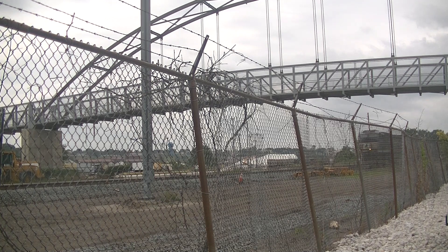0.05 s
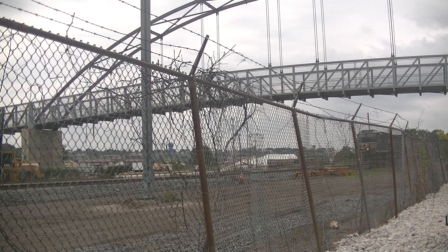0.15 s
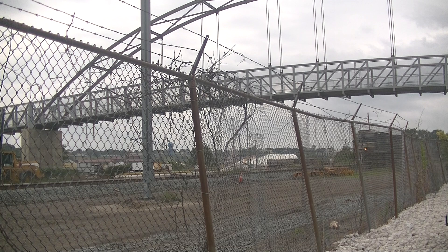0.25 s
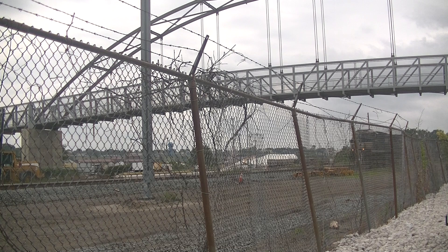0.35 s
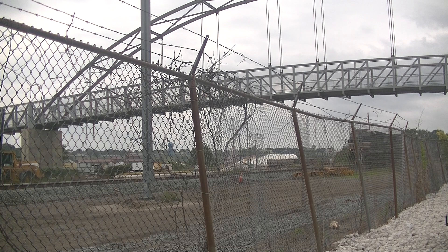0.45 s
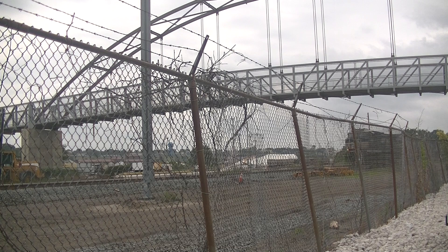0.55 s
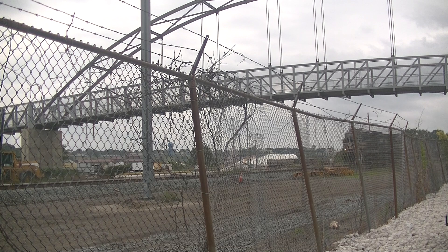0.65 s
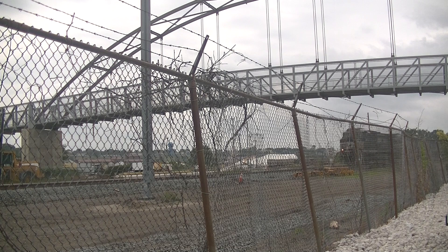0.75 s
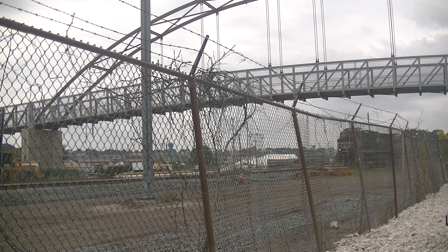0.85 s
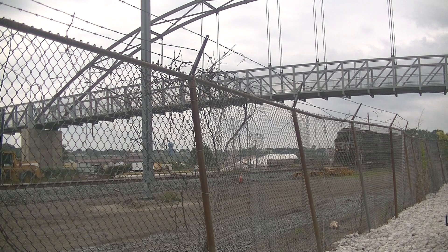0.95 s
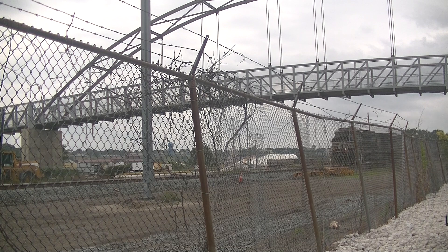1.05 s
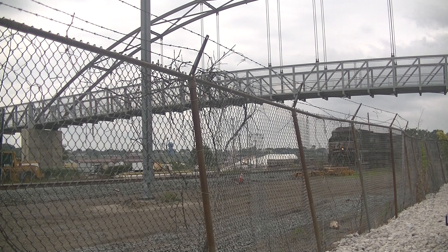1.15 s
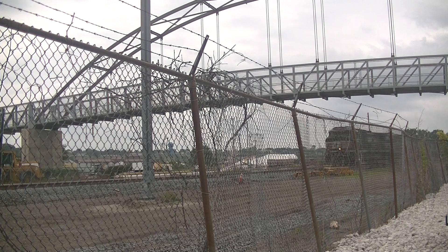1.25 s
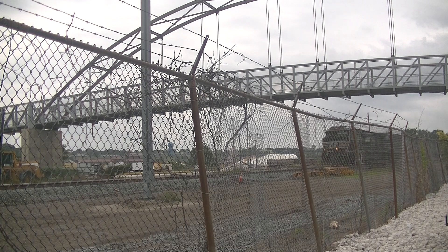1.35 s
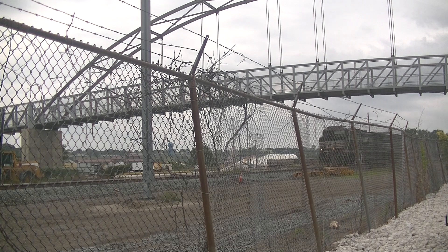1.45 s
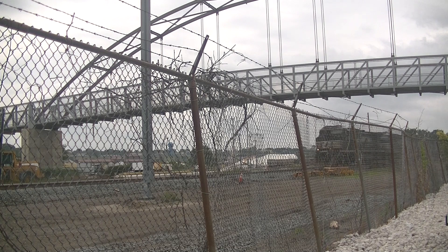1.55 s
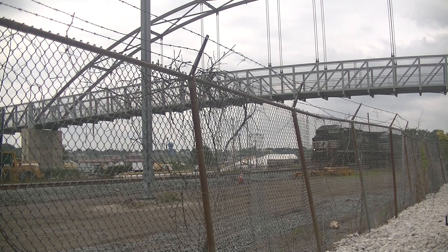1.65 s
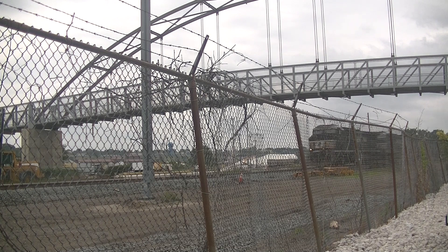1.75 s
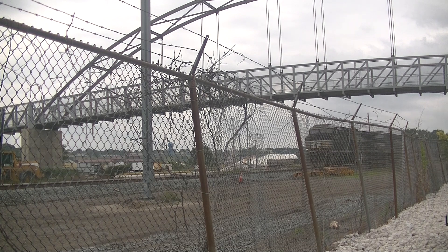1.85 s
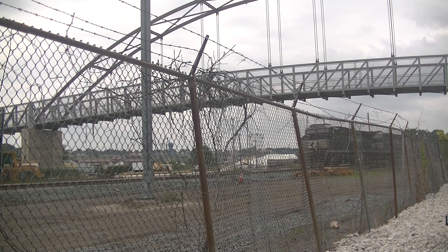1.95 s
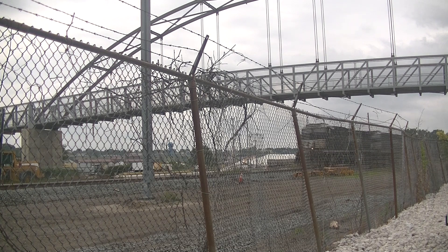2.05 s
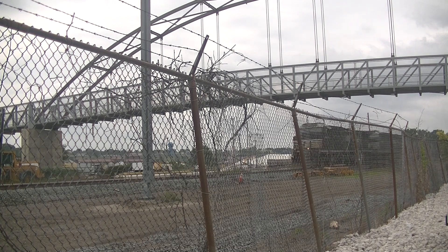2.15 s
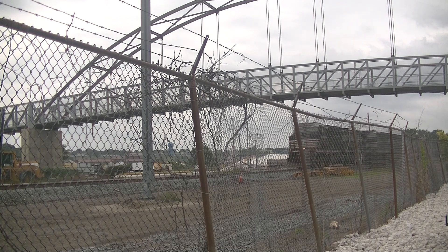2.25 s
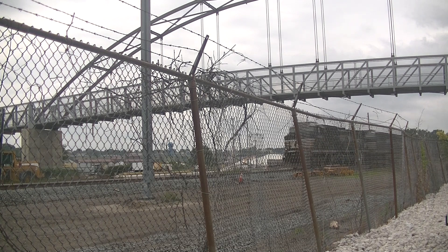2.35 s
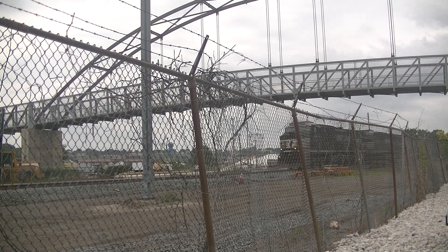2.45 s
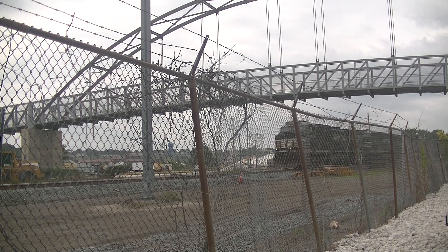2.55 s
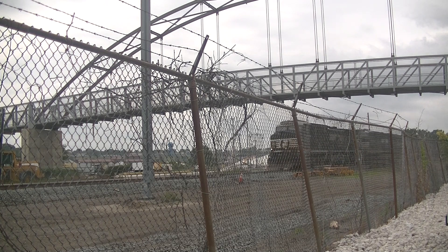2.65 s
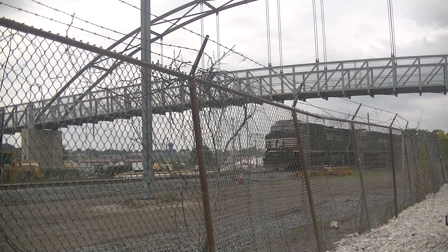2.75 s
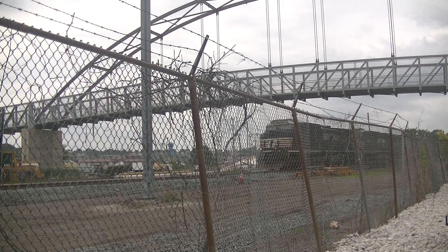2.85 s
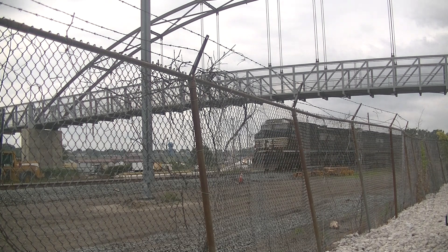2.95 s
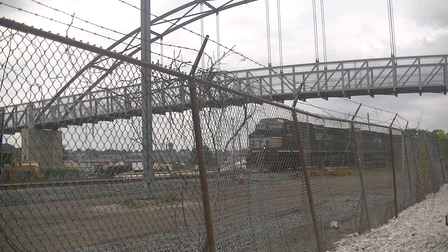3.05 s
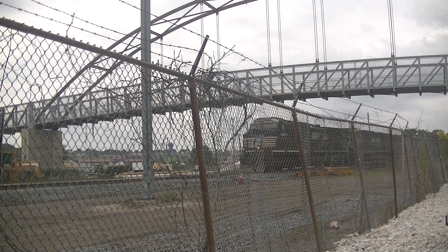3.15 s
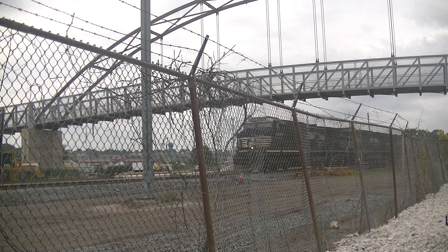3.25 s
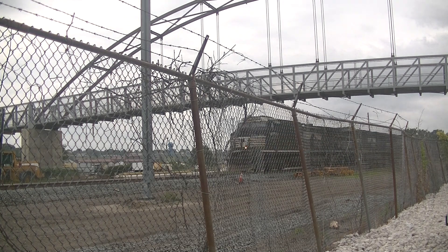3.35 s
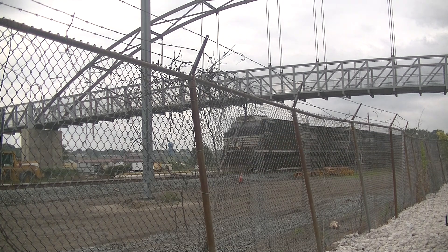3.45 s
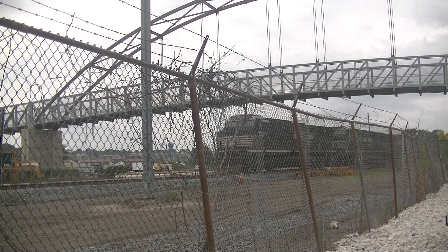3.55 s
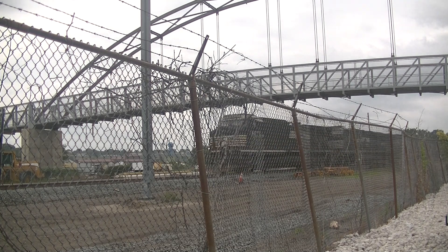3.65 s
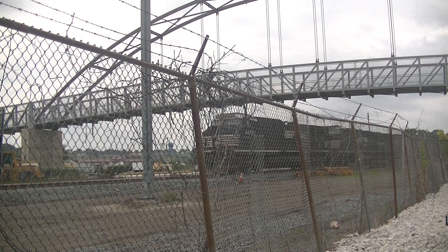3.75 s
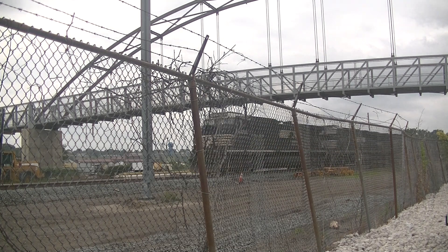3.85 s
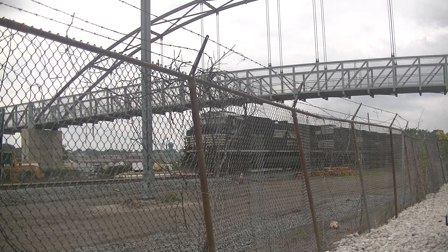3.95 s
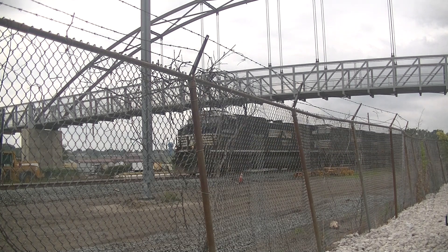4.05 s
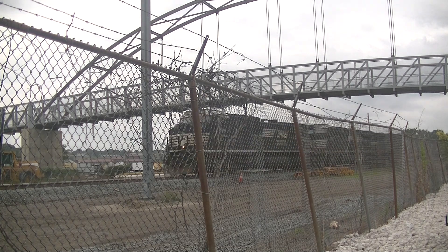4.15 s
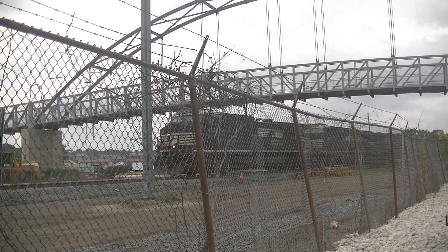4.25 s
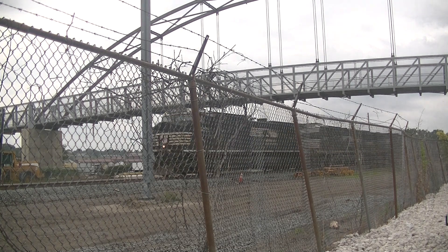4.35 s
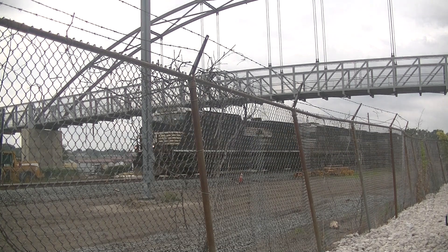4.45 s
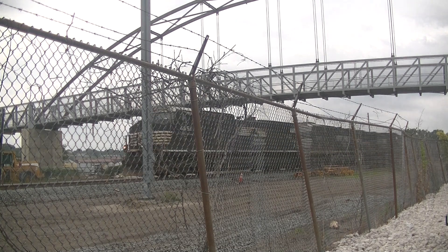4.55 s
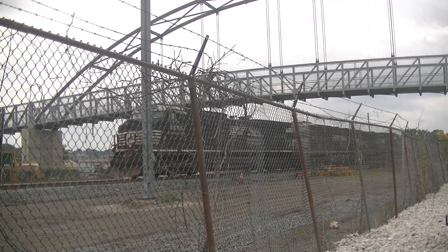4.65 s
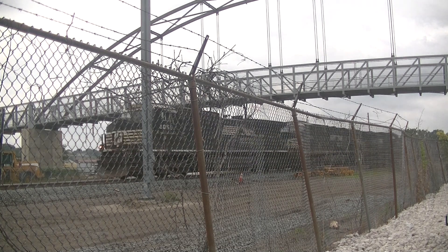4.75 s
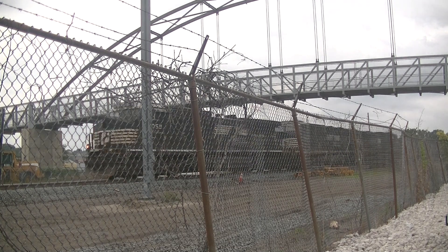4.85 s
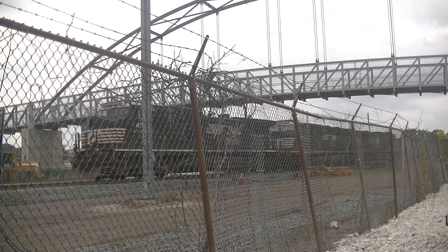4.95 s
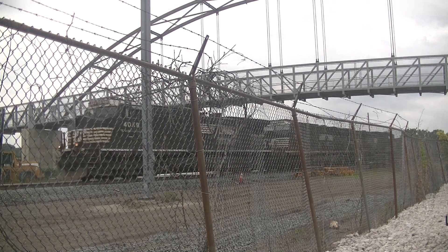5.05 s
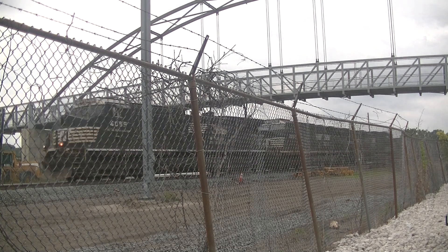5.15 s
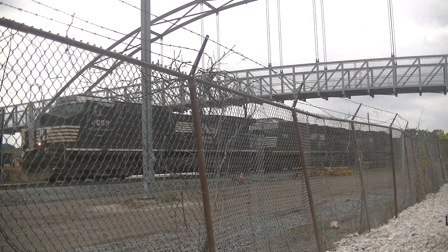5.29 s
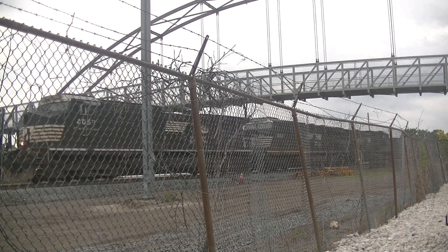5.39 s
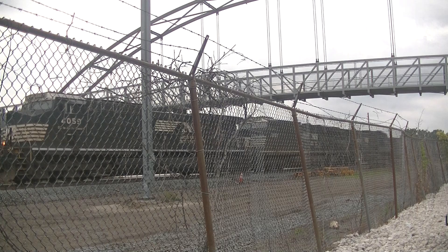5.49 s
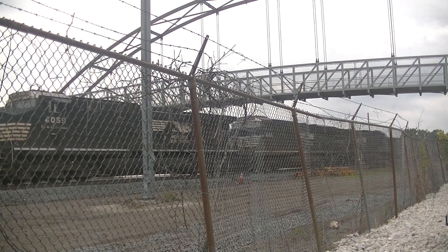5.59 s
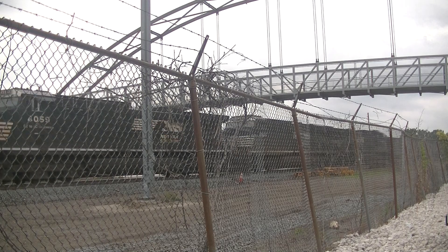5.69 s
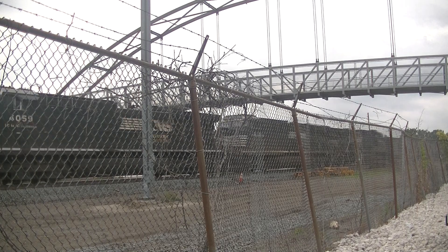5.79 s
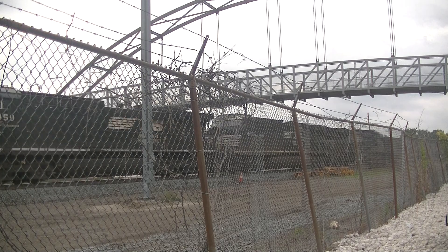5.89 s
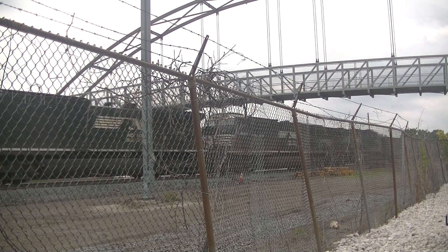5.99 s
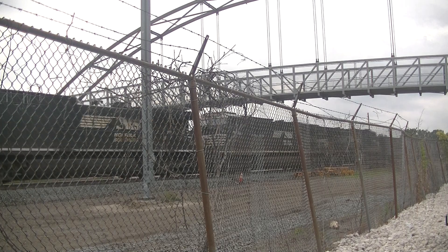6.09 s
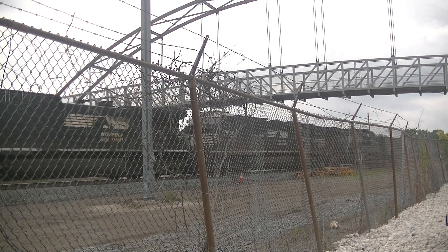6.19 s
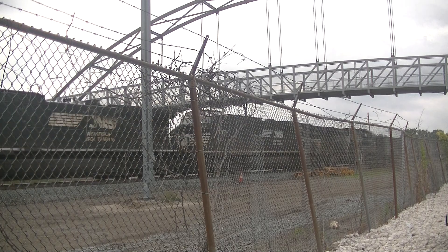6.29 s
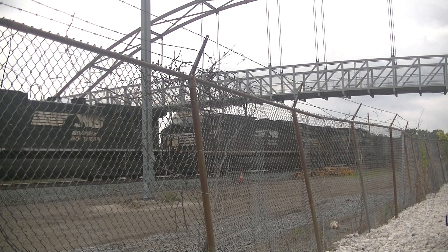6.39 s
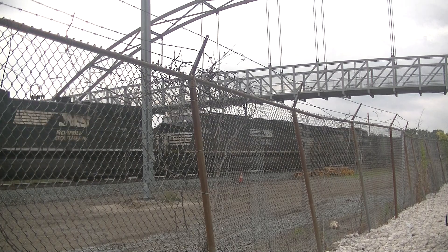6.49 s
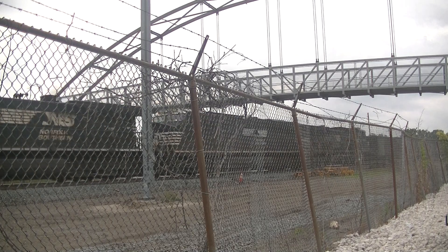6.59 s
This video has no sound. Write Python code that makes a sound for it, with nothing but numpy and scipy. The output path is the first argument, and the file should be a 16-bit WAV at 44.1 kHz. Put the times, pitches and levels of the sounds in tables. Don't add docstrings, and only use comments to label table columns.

```python
import sys
import numpy as np
from scipy import signal
from scipy.fft import rfft, irfft, next_fast_len
from scipy.io import wavfile
from scipy.ndimage import uniform_filter1d

SR = 44100
rng = np.random.default_rng(int(sys.argv[2]) if len(sys.argv) > 2 else 0)


def attenuation_scalar(level_db):
    decades = np.asarray(level_db, float) / 20
    return 10 ** decades


def store_wav(level_fs):
    pcm = np.round(np.clip(np.atleast_2d(level_fs), -1, 1) * 32767)
    wavfile.write(sys.argv[1], SR, pcm.T.astype(np.int16))


N = 292148
T = np.arange(N) / SR
SIZE = next_fast_len(N)
HZ = np.maximum(np.arange(SIZE // 2 + 1) * SR / SIZE, 1)
COARSE = np.arange(N // 16 + 2) * 16

# (time [s], roar level [dB])
NEARNESS_DB = [
    (0.0, -35),
    (2.12, -31.5),
    (4.64, -25),
    (4.66, -25),
    (5.51, -22.5),
    (5.73, -26.5),
    (6.62, -22.5),
]
FAR_DB = -34
ABREAST_S, ABREAST_WIDTH_S = 4.18, 0.069
DOPPLER, PASSES_S, PASS_WIDTH_S = 0.012, 5.2, 1.493

# (frequency [Hz], density [dB])
ROAR_SPECTRUM = [(40, -58), (70, -46), (200, -26.5), (320, -19.5), (430, -17), (540, -10), (680, -12),
                 (850, -8.5), (1000, -9.5), (1300, -4.5), (1800, -10.5), (2400, -9.5), (3300, -16.5),
                 (9000, -52.5)]
GROWL_DB, GROWL_FOLLOWS, GROWL_ABREAST_DB = -51.5, 0.46, 5.5
RUMBLE_DB, RUMBLE_FOLLOWS, RUMBLE_ABREAST_DB = -64.5, 0.93, -4
# (time [s], peak [dB], ring [Hz])
RAIL_JOINTS = [(4.04, -26, 452), (4.29, -31.5, 440), (4.348, -34, 400), (4.72, -28, 428), (4.74, -22, 530),
               (5.03, -29.5, 399), (5.19, -26, 446), (5.4, -37, 520), (5.52, -23.5, 433.3),
               (5.53, -20, 546), (5.68, -25, 520), (5.77, -34, 604)]

# (frequency [Hz], density [dB])
SCRUB_SPECTRUM = [(700, -53), (1500, -10), (2300, -2), (3000, -6.5), (3700, -7), (4200, -6), (5400, -10.5),
                  (7000, -12.5), (7900, -24), (11000, -26), (14000, -30.5), (15600, -34)]
# (start [s], attack [s], hold [s], level above 8 kHz [dB], fall [dB/s])
FLANGE_CONTACTS = [
    (.2, 0.16, 0.026, -56.5, 93),
    (1.144, 0.2, 0.073, -57, 33),
    (1.95, 0.23, 0.27, -61, 28),
    (2.74, 0.17, 0.046, -53.5, 32),
    (4.11, 0.02, 0.071, -39, 40),
    (4.153, 0.17, 0.52, -38.5, 39),
    (5.503, 0.21, 0.052, -33, 58),
    (6.495, 0.038, .1, -39.5, 37),
]
SCRUB_FLOOR_DB, SCRUB_FOLLOWS = -63, 1
BODY_DB, BODY_PER_DB = 16, -0.289
# (frequency [Hz], gain [dB])
RIM_MODES = [(7510, 1), (7880, 0), (8360, 0.5), (8850, 3.5), (9280, 4.5), (10240, 3.5), (10760, -2),
             (11100, 0), (11850, 1), (12260, 2), (12580, 3), (13510, 4), (14290, 5), (14850, 5)]
RIM_WIDTH_HZ = 150

# (start [s], end [s])
WHEEL_SPANS_S = [
    (4.13, 4.5),
    (4.539, 5.16),
    (4.981, 5.27),
    (5.55, 5.94),
    (5.781, 6.28),
    (6.49, 6.7),
]
# (frequency [Hz], level [dB])
WHEEL_1_MODES = [(2288, -41), (3079, -41), (3435, -45), (4592, -37), (4872, -43), (5319, -55), (5722, -60),
                 (6105, -47), (7510, -47), (8360, -51), (8882, -50), (10244, -65), (10767, -70),
                 (13512, -65)]
# (frequency [Hz], level [dB])
WHEEL_2_MODES = [(2530, -34.5), (4635, -52), (5712, -57), (6175, -46), (6966, -55), (7510, -57),
                 (8403, -49.5), (9281, -52), (10239, -56), (10756, -63), (11854, -61), (13507, -61)]
# (frequency [Hz], level [dB])
WHEEL_3_MODES = [(3260, -50), (3397, -41), (3860, -54), (4474, -45), (4522, -50), (5652, -51), (6094, -50),
                 (6955, -46), (8780, -60)]
# (frequency [Hz], level [dB])
WHEEL_4_MODES = [(2885, -37), (3058, -36), (4215, -49), (4840, -39), (5249, -45), (5717, -45), (7009, -51),
                 (7450, -52), (7892, -51), (8344, -50), (8812, -49), (10800, -62), (12586, -61),
                 (13410, -55)]
# (frequency [Hz], level [dB])
WHEEL_5_MODES = [(3208, -38), (3300, -48), (4517, -41), (4770, -51), (5238, -47), (5663, -49), (6040, -44),
                 (6546, -54), (7865, -51), (8323, -48), (9189, -53), (10056, -54), (10654, -57),
                 (10912, -54), (11014, -61), (11612, -59), (12166, -59), (12554, -60), (13017, -66),
                 (13544, -60), (14163, -63), (14874, -63)]
# (frequency [Hz], level [dB])
WHEEL_6_MODES = [(3989, -47), (4387, -52), (4743, -50), (4985, -36), (5852, -33), (6648, -40)]
WHEEL_WIDTH_HZ, WHEEL_WIDTH_SHARE, WHEEL_STEADY = 95, 0.012, 0.1
STAGGER_S = 0.07
# (start [s], length [s], frequency [Hz], level [dB])
SINGING = [(4.11, 0.2, 3860, -35), (4.24, 0.17, 3945, -29), (4.82, 0.24, 3860, -35), (4.58, .25, 3900, -40),
           (5.68, .34, 3853, -32), (4.3, 0.4, 6610, -33), (4.48, 0.4, 6605, -33.5), (5.77, .24, 7433, -30),
           (5.58, .08, 5500, -48), (3.38, 0.68, 1610, -34), (4.8, 0.24, 3135, -33), (4.55, 0.07, 2205, -34),
           (0.35, .09, 3950, -48), (1.3, 0.14, 4160, -49), (2.82, 0.16, 6810, -54),
                 (2.05, .5, 10340, -67), (2.77, .24, 11480, -67), (4.33, .56, 6690, -35),
                 (4.24, 0.18, 3983, -32), (5.54, 0.26, 2465, -30), (5.55, .06, 7005, -43),
                 (6.01, .19, 3105, -37), (5.3, .15, 3270, -43), (4.2, 0.32, 4580, -39),
                 (3.4, .6, 3500, -43), (4.28, .2, 4850, -39), (4.74, .1, 4620, -37), (4.62, .1, 5720, -42),
                 (4.76, .28, 3370, -39), (4.22, .12, 4250, -38), (1.32, .1, 4050, -50)]
SING_ATTACK_S, SING_RELEASE_S, SING_SWAY_DB, SING_WAVER = 0.08, 0.13, 1.5, 0.0015
SING_WIDTH_HZ, SING_WIDTH_SHARE, SING_STEADY = 90, 0.013, 0.15
SING_LOCK_HZ = 5000

FAR_MESH_HZ, FAR_SAG_HZ, FAR_PASS_S, FAR_GEARS_DB, FAR_SECOND_DB = 1195, 89.5, 5.5, -31, -6
FAR_GEARS_FOLLOW, FAR_GEARS_SWELL_DB, GEAR_SAG_S = 0.094, 4, 0.27
# (enter [s], leave [s], mesh [Hz], sag [Hz/s], level [dB])
NEAR_GEARS = [
    (4.702, 5.968, 1105, 36.1, -22),
    (5.78, 6.533, 1080, 22, -18),
]
NEAR_SECOND_DB, NEAR_SWELL_S, NEAR_WIDTH_HZ = (-7, -3), (0.61, 0.32), (79, 107)
NEAR_FADE_S, NEAR_STEADY = 0.11, 0.2
GEAR_PASS_S, GEAR_PASS_HZ = 6.56, 69.6

FAN_A_HZ, FAN_A_DB = 266.8, (-54.5, -50, -45)
FAN_B_HZ, FAN_B_DB = 287, (-54, -50.5, -50.5)
# (start [s], length [s], gain [dB])
FAN_A_BEAMS = [
    [(1.6, 0.3, 9.5), (2.5, 0.12, 5), (3.1, 0.93, 7.5), (4.25, 0.29, 7.5), (4.55, 0.071, -8),
     (4.66, 0.15, 6), (4.92, .1, 0), (5.08, 0.22, 8), (5.4, 0.41, 3), (5.8, 0.34, 8)],
    [(3.4, 0.57, 6.5), (4.7, 0.42, 6.5), (5.5, 0.18, 8)],
    [(1.45, 0.84, 5), (2.47, 0.26, 8), (2.8, 0.24, 6), (3.25, 0.79, 6.5), (4.75, 0.49, 2.5), (6.1, 0.58, 6)],
]
# (start [s], length [s], gain [dB])
FAN_B_BEAMS = [
    [(3.3, 0.48, -1), (4.56, 0.074, -7), (4.9, 0.092, 8), (5.05, 0.32, 8), (5.6, .65, 6.5)],
    [(6.1, 0.72, 2.4)],
    [(3.9, 0.38, 5.2), (6.45, .2, 6)],
]
BEAM_EDGE_S = 0.038
FAN_WAVER, FAN_SWAY_DB, FAN_FOLLOWS, FAN_WIDTH_HZ, FAN_STEADY = 0.004, 0.8, 0.95, 11, 0.5

TURBO_HZ, TURBO_SAG_HZ_PER_S2, TURBO_ENDS_S = 3560, 13.3, 3.8
TURBO_DB, TURBO_FOLLOWS, TURBO_SWAY_DB = -49, 1.1, 1.0
# (start [s], length [s], gain [dB])
TURBO_BEAMS = [
    (.9, .4, 4),
    (1.5, .9, 2),
    (2.55, .5, 4),
    (3.2, .5, 5),
]

TICK_FIRST_S, TICK_PERIOD_S, TICK_EXTRA_S, TICK_DB = 0.0172, 0.33393, 2.1645, -38
TICK_RATTLE_S, TICK_WHIRR_S, TICK_WHIRR_DB = 0.0039, 0.02, -10
# (time [s], peak [dB], push width [ms])
KNOCKS = [(0.259, -14, 0.73), (0.2712, -15, 0.97), (.293, -27, 1.1), (.437, -21, 1.26), (.553, -22, 1.3),
          (.5765, -17, 1.16), (.824, -25, 1.3), (0.9299, -8, 0.85), (1.2041, -20, 1.24),
          (1.3317, -21, 1.15), (1.974, -19, 1.2), (2.313, -21, 1.2), (2.356, -21, 1.2), (2.694, -27, 1.7),
          (2.974, -20, 1.3), (3.175, -20, 1.2)]
# (time [s], peak [dB])
TAPS = [
    (1.5878, -30),
    (5.2494, -26),
]

# (frequency [Hz], common share [1])
LIKENESS = [(60, 0.6), (130, 0.92), (290, 0.71), (640, 0.89), (1000, 0.93), (1410, 0.75), (2200, 0.49),
            (3100, 0.56), (6820, 0.74), (15000, 0.22)]
# (frequency [Hz], left over right [dB])
LEFT_OVER_RIGHT_DB = [(60, 13), (130, 4.5), (250, 10), (400, 11), (700, 15), (1290, 14.5), (1900, 18.5),
                      (2500, 13), (3300, 8), (4400, 9.5), (8100, 12), (15000, 17)]
# (frequency [Hz], left lead [rad])
LEFT_LEAD_RAD = [(100, 1), (1000, -0.17), (3000, -1.06), (4000, 0.6), (7500, -1.32), (15000, -1.1)]


def rolling():
    roar_db, scrub_db = nearness(), flange()
    abreast = step(ABREAST_S, ABREAST_WIDTH_S)
    growl_db = GROWL_DB + GROWL_FOLLOWS * nearer() + GROWL_ABREAST_DB * abreast
    rumble_db = RUMBLE_DB + RUMBLE_FOLLOWS * nearer() + RUMBLE_ABREAST_DB * abreast
    body_db = BODY_DB + BODY_PER_DB * (scrub_db - FAR_DB + 20.5)
    shelves = [(690, growl_db - roar_db + 17), (313, rumble_db - growl_db + 11.0)]
    roar = airy(ROAR_SPECTRUM, (1300, 2000), 1.0, shelves, 3)
    scrub = airy(SCRUB_SPECTRUM, (8000, 15000), 1.0, [(9000, 1.55 * (body_db - 11.5))], 9, RIM_MODES)
    scrub = scrub * attenuation_scalar(0.57 * walk(29) + 0.7 * walk(370))
    clunks, span = np.zeros(N), np.arange(-1024, 4096)
    t = span / SR
    for s, db, hz in RAIL_JOINTS:
        swell = np.exp(-((t - 0.02) / 0.024) ** 2)
        clunks[int(s * SR) + span] += attenuation_scalar(db - 5.5) * ring(hz + 0 * t, 110, steady=0.35) * swell
    return roar * attenuation_scalar(roar_db - 0.14) + scrub * attenuation_scalar(scrub_db - 1.7) + clunks


def flange():
    power = attenuation_scalar(2 * (SCRUB_FLOOR_DB + SCRUB_FOLLOWS * nearer()))
    for start, attack, hold, db, fall in FLANGE_CONTACTS:
        bite = np.clip((T - start) / attack, 0, 1)
        slide_s = np.maximum(T - start - attack - hold, 0)
        power = power + (bite * attenuation_scalar(db - fall * slide_s)) ** 2
    return 10 * np.log10(power)


def squeal():
    out, scrub_db = np.zeros(N), flange()
    wheels = (WHEEL_1_MODES, WHEEL_2_MODES, WHEEL_3_MODES, WHEEL_4_MODES, WHEEL_5_MODES, WHEEL_6_MODES)
    for (start, end), modes in zip(WHEEL_SPANS_S, wheels):
        on = slice(int(start * SR), int(end * SR))
        t = T[on]
        contact = np.clip(np.minimum(t - start, end - t) / 0.024, 0, 1)
        contact = contact * attenuation_scalar(0.94 * (scrub_db[on] - np.median(scrub_db[on])))
        for (hz, db), late in zip(modes, rng.uniform(-0.15, 1, len(modes))):
            fade = held(start + STAGGER_S * late, end - start - 2 * STAGGER_S, 0.082, 0.13, t)
            tone = ring(hz + 0 * t, WHEEL_WIDTH_HZ + WHEEL_WIDTH_SHARE * hz, WHEEL_STEADY)
            out[on] += contact * fade * attenuation_scalar(db + 4.0 + hz / 5000) * tone
    bite = np.exp(-((T - 4.17) / 0.079) ** 2)
    out += attenuation_scalar(-21.5) * bite * ring(2500 + 0 * T, 500, steady=0.042)
    sway_db, waver = SING_SWAY_DB * walk(6.6), 1 + SING_WAVER * walk(6.7)
    for s, length, hz, db in SINGING:
        on = slice(int(s * SR), int((s + length + SING_RELEASE_S) * SR))
        fade = held(s, length, SING_ATTACK_S, SING_RELEASE_S, T[on])
        width_hz = SING_WIDTH_HZ + SING_WIDTH_SHARE * hz
        tone = ring(hz * waver[on], width_hz, SING_STEADY * (hz / SING_LOCK_HZ) ** 2)
        out[on] += fade * attenuation_scalar(db + 3.5 + sway_db[on]) * tone
    return out


def gears():
    swell_db = FAR_GEARS_FOLLOW * nearer() + FAR_GEARS_SWELL_DB * step(FAR_PASS_S - 0.4, 0.38)
    fade = held(-0.91, FAR_PASS_S + 0.99, 0.72, 0.46)
    far_hz = FAR_MESH_HZ - FAR_SAG_HZ * step(FAR_PASS_S, GEAR_SAG_S)
    out = fade * attenuation_scalar(FAR_GEARS_DB - 1.0 + swell_db) * gear_whine(far_hz, 238, FAR_SECOND_DB)
    settings = zip(NEAR_GEARS, NEAR_SECOND_DB, NEAR_SWELL_S, NEAR_WIDTH_HZ)
    for (enter, leave, mesh_hz, sag, db), second_db, swell_s, width_hz in settings:
        hz = mesh_hz - sag * (T - enter) - GEAR_PASS_HZ * step(GEAR_PASS_S, 0.0576)
        fade = held(enter, leave - enter, swell_s, NEAR_FADE_S)
        out = out + fade * attenuation_scalar(db) * gear_whine(hz, width_hz, second_db, NEAR_STEADY)
    return out


def gear_whine(hz, width_hz, second_db, steady=0.045):
    octave = ring(2 * hz, 2.04 * width_hz, 0.044)
    return ring(hz, width_hz, steady) + attenuation_scalar(second_db - 3.0) * octave


def fan(blade_hz, levels_db, beams):
    shift = DOPPLER * (0.5 - step(PASSES_S, PASS_WIDTH_S))
    hz, out = blade_hz * (1 + shift + FAN_WAVER * walk(1.501)), 0
    for k, (db, gaps) in enumerate(zip(levels_db, beams), 1):
        open_db = sum(gain_db * held(s, length, BEAM_EDGE_S, BEAM_EDGE_S) for s, length, gain_db in gaps)
        level_db = db + FAN_FOLLOWS * nearer() + open_db + FAN_SWAY_DB * walk(3.8)
        out = out + ring(k * hz, FAN_WIDTH_HZ * k, FAN_STEADY) * attenuation_scalar(level_db)
    return out


def turbo():
    open_db = sum(db * held(s, length, 0.12, 0.11) for s, length, db in TURBO_BEAMS)
    level_db = TURBO_DB + TURBO_FOLLOWS * nearer() + TURBO_SWAY_DB * walk(6.0) + open_db
    tone = ring(TURBO_HZ - TURBO_SAG_HZ_PER_S2 * T ** 2, 65, steady=0.4)
    return held(0.75, TURBO_ENDS_S - 0.7, 0.19, 0.17) * attenuation_scalar(level_db) * tone


def camera():
    out, span = np.zeros((2, N)), np.arange(-400, 1200)
    t = span / SR
    decay = np.exp(-t / TICK_RATTLE_S) + attenuation_scalar(TICK_WHIRR_DB) * np.exp(-t / TICK_WHIRR_S)
    for s in [*(TICK_FIRST_S + TICK_PERIOD_S * np.arange(12)), TICK_EXTRA_S]:
        bright = np.diff(rng.standard_normal((2, 1602)), 1)[:, 1:]
        rattle = uniform_filter1d(bright, size=2) * decay * (t > 0)
        out[:, int(s * SR) + span] += attenuation_scalar(TICK_DB - 2.0) * rattle * [[1], [attenuation_scalar(-7)]]
    for s, db, ms in KNOCKS:
        u = t / (ms * 0.00041)
        push = (1 - u ** 2) * np.exp(-u ** 2 / 2)
        out[:, int(s * SR) + span] += attenuation_scalar(db + 4.5) * push * [[1], [-attenuation_scalar(-10.0)]]
    for s, db in TAPS:
        tap = np.sin(2 * np.pi * 1450 * t) * np.exp(-((t - 0.006) / 0.005) ** 2)
        out[1, int(s * SR) + span] += attenuation_scalar(db + 7) * tap
    return out


def nearness():
    return np.interp(T, *np.transpose(NEARNESS_DB))


def nearer():
    return nearness() - FAR_DB


def held(start, length, attack, release, t=T):
    return np.clip(np.minimum((t - start) / attack, (start + length - t) / release + 1), 0, 1)


def step(s, width):
    return 0.5 + 0.5 * np.tanh((T - s) / width)


def along(table):
    f, v = np.transpose(table)
    return np.interp(np.log(HZ), np.log(f), v)


def slow(drive, rate):
    pole = np.exp(-np.pi * rate * COARSE[1] / SR)
    return signal.lfilter([1], [1, -2 * pole, pole ** 2], drive)


def walk(rate):
    sway = slow(rng.standard_normal(len(COARSE)), rate)
    return np.interp(np.arange(N), COARSE, sway / np.std(sway))


def ring(hz, width_hz, steady):
    at = COARSE[:len(hz) // COARSE[1] + 2]
    sway = slow(rng.standard_normal((len(at), 2)) @ [1, 1j], width_hz)
    steady = np.clip(steady, 0, 1)
    sway = np.sqrt(steady) + np.sqrt(1 - steady) * sway / np.sqrt(np.mean(abs(sway) ** 2))
    n = np.arange(len(hz))
    size = np.interp(n, at, abs(sway))
    turn = np.interp(n, at, np.unwrap(np.angle(sway)))
    return np.sqrt(2) * size * np.cos(turn + 2 * np.pi * np.cumsum(hz) / SR)


def airy(spectrum, ref_hz, flicker_db, shelves, first, modes=()):
    modes_db = sum(db / (1 + (2 * (HZ - hz) / RIM_WIDTH_HZ) ** 2) for hz, db in modes)
    noise = rfft(rng.standard_normal(SIZE)) * attenuation_scalar(along(spectrum) + modes_db)
    noise /= np.std(irfft(noise * (HZ > ref_hz[0]) * (HZ < ref_hz[1])))
    out, place = 0, np.clip(1.5 * np.log2(HZ / 30), first, 14)
    for band in range(first, 15):
        db = sum(np.clip(1.546 * np.log2(knee_hz / 30) - band, 0, 1) * shelf_db for knee_hz, shelf_db in shelves)
        part = irfft(noise * np.clip(1 - abs(place - band), 0, 1), SIZE)[:N]
        out = out + part * attenuation_scalar(flicker_db * walk(3.9) + db)
    return out


def scene():
    fans = fan(FAN_A_HZ, FAN_A_DB, FAN_A_BEAMS) + fan(FAN_B_HZ, FAN_B_DB, FAN_B_BEAMS)
    left = rfft(rolling() + squeal() + gears() + fans + turbo(), SIZE)
    scatter = rfft(rng.standard_normal(2048))
    echoes = rfft(irfft(scatter / abs(scatter)), SIZE)
    common = np.clip(along(LIKENESS), 0.01, 1) ** 0.59
    path = common * np.exp(-1j * along(LEFT_LEAD_RAD)) + np.sqrt(1 - common ** 2) * echoes
    right = left * attenuation_scalar(-along(LEFT_OVER_RIGHT_DB)) * path
    train = irfft(np.array([left, right]), SIZE)[:, :N]
    drift_db = [0 * T, 1.5 - 0.39 * T]
    return attenuation_scalar(4.0) * train * attenuation_scalar(drift_db) + camera()


def top_cut(x):
    return signal.sosfilt(signal.butter(12, 15800, fs=SR, output="sos"), x)


def record(dry):
    rounded = np.tanh(0.65 * dry) / 0.65
    thin = signal.sosfilt(signal.butter(N=3, Wn=75, btype="high", fs=SR, output="sos"), rounded)
    mix = signal.sosfilt(signal.ellip(8, 0.2, 60, 15760, fs=SR, output="sos"), thin)
    return top_cut(mix)


dry = scene()
out = record(dry)
store_wav(out)
```